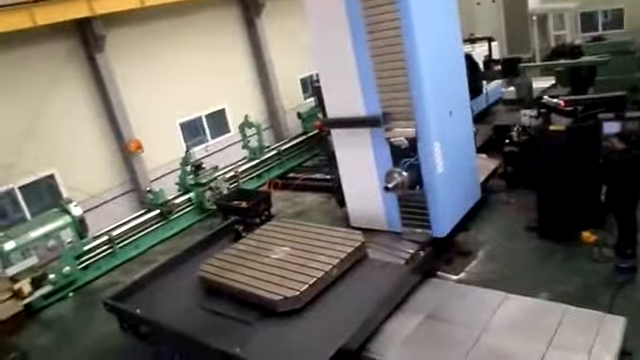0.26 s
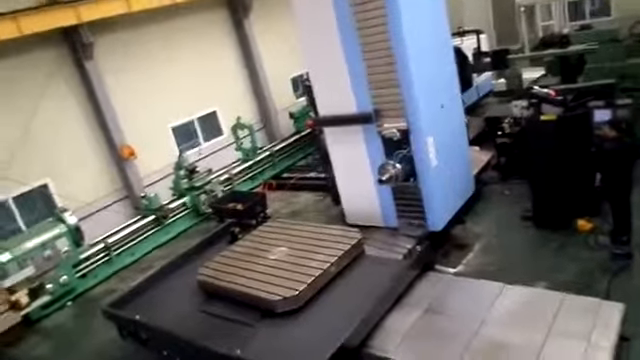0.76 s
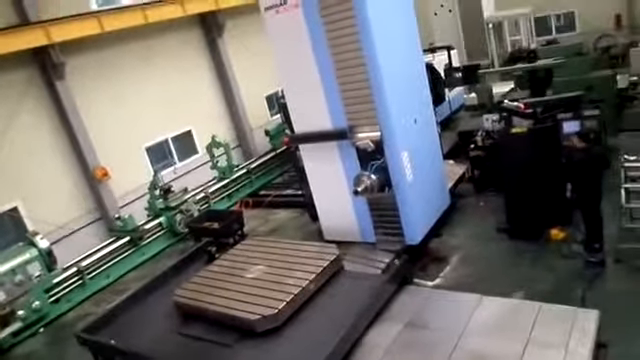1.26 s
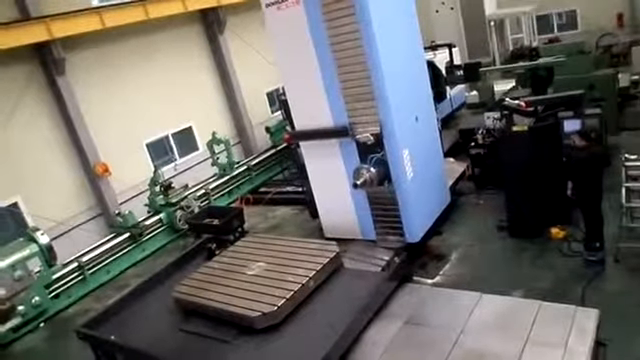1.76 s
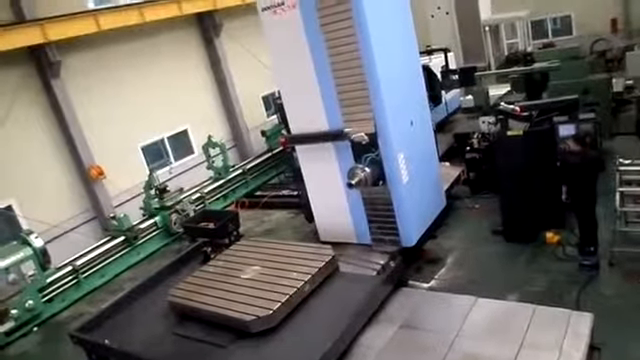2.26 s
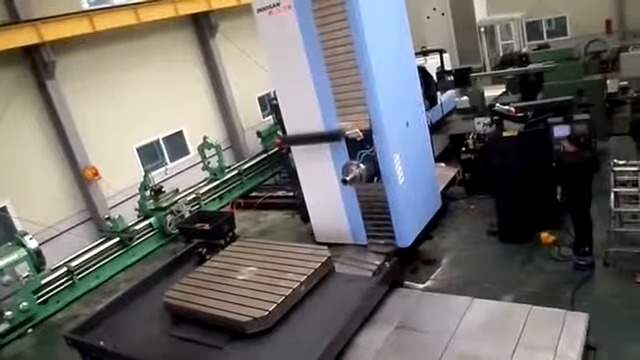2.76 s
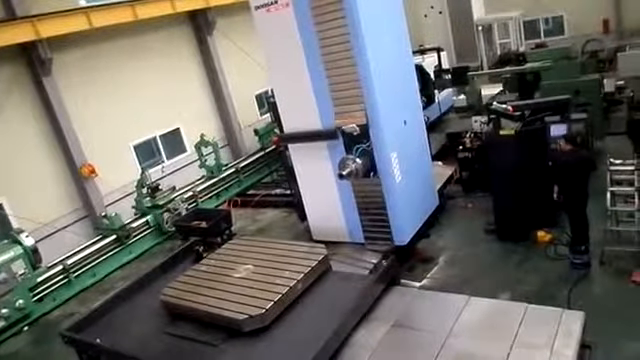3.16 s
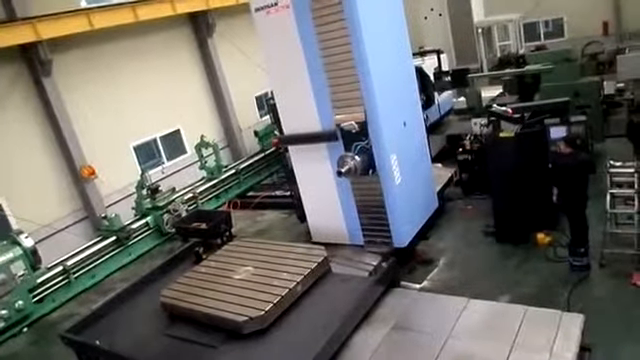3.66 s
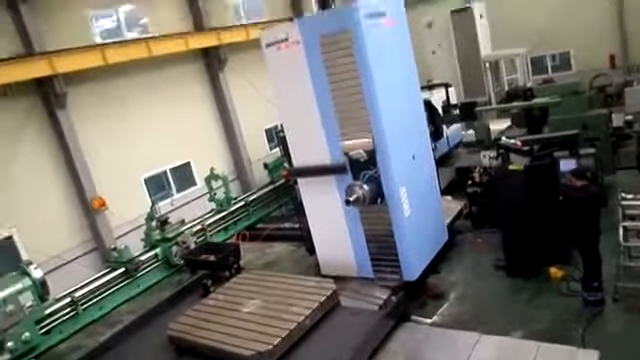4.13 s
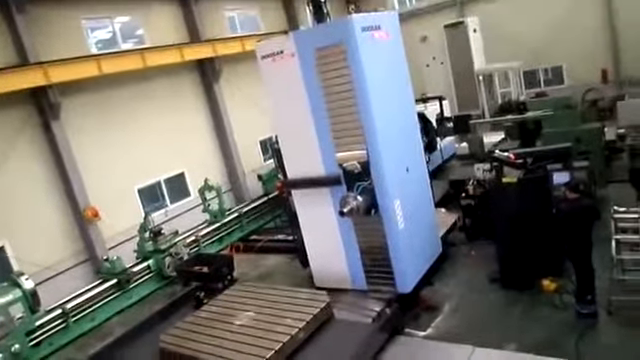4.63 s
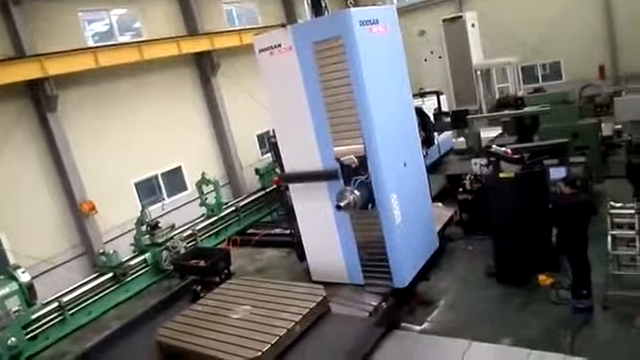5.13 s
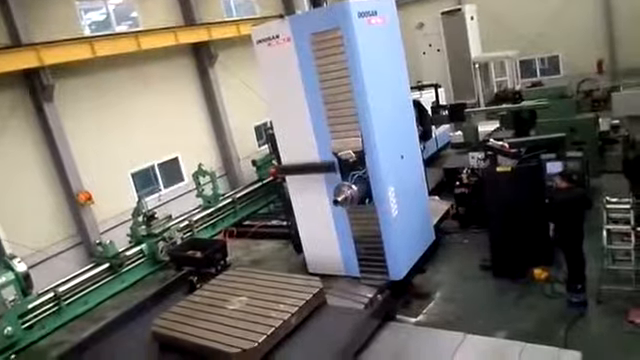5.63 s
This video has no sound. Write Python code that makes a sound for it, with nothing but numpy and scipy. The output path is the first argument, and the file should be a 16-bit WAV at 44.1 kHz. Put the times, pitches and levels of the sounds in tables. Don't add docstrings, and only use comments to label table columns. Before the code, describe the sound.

A pump hums in a noisy factory hall while a machine tool's drive whine glides up, holds, sinks to silence, then rises again.

```python
import sys
import numpy as np
from scipy import signal
from scipy.fft import rfft, irfft
from scipy.io import wavfile
from scipy.ndimage import uniform_filter1d

SR = 44100
rng = np.random.default_rng(int(sys.argv[2]) if len(sys.argv) > 2 else 0)


def pcm_store(signal):
    levels = np.round(np.clip(np.atleast_2d(signal), -1, 1) * 32767)
    wavfile.write(sys.argv[1], SR, levels.astype(np.int16).T)


def attenuation_scalar(level_db):
    decades = np.asarray(level_db, float) / 20
    return 10 ** decades


N = 259749
TURN_HZ = 11.1115
SWITCH_HZ = 4000
KNOCK_S = 2.315


def unit(x):
    return x / np.sqrt(np.mean(x ** 2) + 1e-20)


def along(points, hz):
    f, v = np.transpose(points)
    return np.interp(np.log(hz + 1), np.log(f + 1), v)


def wobble(rate):
    knots = rng.standard_normal(int(N * rate / SR) + 2)
    return np.interp(np.arange(N) * rate / SR, np.arange(len(knots)), knots)


def swings(rows):
    t = np.arange(N) / SR
    return sum(db * np.exp(-((t - s) / width) ** 2) for s, width, db in rows)


def swell(start, rise, end, fall):
    t = np.arange(N) / SR
    return -rise * np.maximum(start - t, 0) - fall * np.maximum(t - end, 0)


def rush(spectrum, patchy_db):
    hz, _, z = signal.stft(rng.standard_normal(N + 2048), SR, nperseg=2048)
    field = uniform_filter1d(rng.standard_normal(z.shape), size=20, axis=0)
    field = uniform_filter1d(field, size=4, axis=1)
    gain_db = along(spectrum, hz)[:, None] + patchy_db * unit(field)
    return unit(signal.istft(z * attenuation_scalar(gain_db), nperseg=2048)[1][:N])


def tone(turns, scatter=1):
    return np.sqrt(2) * np.exp(2j * np.pi * (turns + scatter * (rng.random() - .5)))


# frequency in Hz, t60 in seconds.
HALL_T60 = [(300, 0.6), (1200, 2.07), (4000, 1.25), (8000, 0.46), (14000, 0.27)]


def hall(hz_grid, wet_db, build):
    hz, t, z = signal.stft(rng.standard_normal(2 * SR), SR, nperseg=256)
    decay = attenuation_scalar(-60 * t / along(HALL_T60, hz)[:, None])
    tail = signal.istft(z * decay * (1 - np.exp(-t / build)), SR, nperseg=256)[1]
    return 1 + attenuation_scalar(wet_db) * rfft(tail / np.linalg.norm(tail), 2 * len(hz_grid) - 2)


def heard(partials, response, hz_grid):
    def at(hz):
        return np.interp(hz, hz_grid, response.real) + 1j * np.interp(hz, hz_grid, response.imag)

    source = np.zeros(N)
    for x, hz in partials:
        gain = at(hz)
        typical = np.sqrt(np.mean(np.abs(at(hz + np.arange(-20, 20))) ** 2))
        source += (x * np.exp(-1j * np.angle(gain))).real / max(abs(gain), .6 * typical)
    return irfft(rfft(source, 2 * len(hz_grid) - 2) * response)[:N]


FEED_CORNERS_S = [
    .19,
    .61,
    3.98,
    4.421,
    5.203,
    5.62,
]


def feed():
    speed = np.interp(np.arange(N) / SR, FEED_CORNERS_S, [0, 1, 1, 0, 0, 1])
    for _ in range(2):
        speed = uniform_filter1d(speed, int(.12 * SR))
    return speed


# time in seconds, width in seconds, change in dB.
JOLTS = [
    (.72, .05, 12),
    (4.3, 0.12, 3),
    (5.8, 0.034, -11),
]


def drive_load(speed, push):
    speeding_up_db, braking_db, cruising_db = 15.5, 15.5, 0.5
    force_db = speeding_up_db * np.maximum(push, 0) + braking_db * np.maximum(-push, 0)
    return cruising_db + force_db + swings(JOLTS) + .35 * 20 * np.log10(speed + 1e-3)


# frequency in Hz, level in dB.
PUMP = [(120, -51.5), (177, -51.5), (269.1, -37), (360, -47.5), (447.7, -50), (538.2, -48), (807.3, -58),
        (1883.7, -54.5), (2152.8, -55), (2421.9, -48), (2960, -70), (3229.2, -52.5), (3498.3, -56.5)]
# frequency in Hz, level in dB per Hz.
HALL_NOISE = [(15, -18), (30, -12), (55, -3), (95, -6.5), (125, 1), (220, -1.5), (270, 8), (330, -1.5),
              (600, -5), (1200, -5.5), (1700, -10), (3300, -11.5), (4300, -33), (10000, -21.5),
              (15000, -28.5)]


def background():
    t = np.arange(N) / SR
    hum = sum(attenuation_scalar(db + 0.57 * wobble(7)) * tone(hz * t + 0.045 * wobble(4.4)) for hz, db in PUMP)
    return hum.real + attenuation_scalar(-35 + 0.88 * wobble(1.6)) * rush(HALL_NOISE, patchy_db=1.66)


# frequency in Hz, level in dB per Hz.
GUIDES = [(100, -59), (300, -4), (700, -5), (1000, -3.5), (1250, 3), (1600, -7), (2400, -7.5), (3500, -10),
          (4200, -12), (6000, -15.5), (10000, -20.5), (12000, -32.5), (15000, -44)]


def guides(speed):
    idle_db, gain_db, lag_s, sag_db_per_s = -38, 5.5, 0.074, 0.37
    keep = np.exp(-1 / (lag_s * SR))
    lagged = signal.lfilter([1 - keep], [1, -keep], speed)
    level_db = idle_db + gain_db * lagged - sag_db_per_s * np.arange(N) / SR
    return attenuation_scalar(level_db) * rush(GUIDES, patchy_db=0.78)


def carrier(speed):
    t = np.arange(N) / SR
    first_start, halt, second_start = FEED_CORNERS_S[0], FEED_CORNERS_S[3], FEED_CORNERS_S[4]
    later = t > (halt + second_start) / 2
    since = np.maximum(t - np.where(later, second_start, first_start), 0)
    lingering = uniform_filter1d(speed, int(0.18 * SR))
    opened = np.minimum(4.4 * lingering + 0.041, 1)
    sag_db_per_s = 2
    return np.where(later, -48, -48.5) - sag_db_per_s * since * opened + 20 * np.log10(opened)


def current(speed, rising):
    sing = np.exp(-((speed - .5) / .25) ** 2)
    sing_db = np.where(rising, 9, 9) * sing
    lingering = uniform_filter1d(speed, int(.3 * SR))
    return -35.5 + 20 * np.log10(lingering + 0.038) + sing_db


# switching multiple, order of the belt pattern, level in dB.
WINDING = [(2, 24, -2.5), (2, -24, -15.5), (2, 48, -26), (3, 36, -27), (3, -36, -31), (3, 12, -34),
           (1, 12, -24)]
# time in seconds, width in seconds, change in dB.
THIRD = [
    [(.75, 0.41, 10), (5.75, .3, 4)],
    [(.75, 0.33, .5), (5.75, 0.29, 8)],
]


def inverter(speed, turns, rising, hz):
    current_db = current(speed, rising)
    clock = SWITCH_HZ * np.arange(N) / SR
    partials = []
    for m, k, db in WINDING:
        level_db = current_db + db + (2.0 + 1.0 * (m > 2)) * wobble(5.4)
        if m > 2:
            level_db = level_db + swings(THIRD[int(k > 0)])
        partials.append((attenuation_scalar(level_db) * tone(m * clock + np.round(k) * turns),
                         m * SWITCH_HZ + k * TURN_HZ))
    partials.append((attenuation_scalar(carrier(speed)) * tone(2 * clock), 2 * SWITCH_HZ))
    return heard(partials, hall(hz, wet_db=-2.0, build=0.1), hz)


# order of the belt pattern, level in dB at full feed.
TEETH = [(104, -38), (105, -44), (106, -37), (109, -44), (110, -48), (113, -47), (114, -43), (116, -48),
         (119, -49), (120, -44), (121, -46), (123, -43), (216, -49), (217, -48), (219, -43), (225, -47),
         (300, -48), (312, -52), (321, -43), (324, -47), (325, -46), (327, -45), (393, -52), (429, -51),
         (432, -57), (435, -51), (648, -54), (651, -58), (756, -61)]
# first order, last order, step in orders, level in dB.
FAINT = [(75, 102, 9, -52), (125, 130, 1, -53), (138, 153, 15, -51), (213, 215, 2, -52), (223, 227, 4, -53),
         (333, 339, 6, -57), (369, 399, 27, -59), (861, 867, 3, -67)]
# time in seconds, width in seconds, change in dB.
MESH_PATH = [
    (1.3, 0.47, -22),
    (2.3, 0.31, 4.5),
    (3.4, 0.7, -6),
]
# time in seconds, width in seconds, change in dB.
FOURTH = [
    (.85, 0.38, -9),
    (5.8, .3, -7),
]
# frequency in Hz, gain in dB.
HOUSING = [(600, -27), (790, -12.5), (860, -3), (960, -8), (1100, -1), (1200, 6), (1400, 8), (2400, -36),
           (3000, -14), (3600, 15.5), (10000, -16)]


def teeth(turns, load_db, spin_db, push, hz):
    turns = turns - turns[int(KNOCK_S * SR)]
    mesh_hz = 108 * TURN_HZ
    orders = list(TEETH)
    for first, last, step, db in FAINT:
        orders += [(k, db) for k in range(first, last + 1, step)]
    late_db = swings(FOURTH)
    levels = [(108, -30.5 + swings(MESH_PATH))]
    for k, db in orders:
        drift_db = (1.3 + 1.5 * (k > 200)) * wobble(2.5 + 4 * (k > 200))
        side_db = 3 * spin_db * (k > 109) * (1 + k / 120)
        levels.append((k, db + (k > 400) * late_db + drift_db + side_db))
    partials = []
    for k, db in levels:
        load_share = 1 if k == 108 else 0.44 * (k < 110)
        scatter = .15 if k in (104, 106, 108, 114, 120, 123) else 1
        partials.append((attenuation_scalar(db + load_db * load_share) * tone(k * turns, scatter), k * TURN_HZ))
    chatter = unit(uniform_filter1d(rng.standard_normal(N), int(.004 * SR)))
    partials.append((attenuation_scalar(1.3 * load_db - 44) * chatter * tone(108 * turns), mesh_hz))
    grind = unit(uniform_filter1d(rng.standard_normal(N), int(.008 * SR)))
    partials.append((attenuation_scalar(-36) * np.abs(push) * (1 + grind) * tone(108 * turns), mesh_hz))
    return heard(partials, attenuation_scalar(along(HOUSING, hz)) * hall(hz, wet_db=5.0, build=0.058), hz)


def pitch_errors(turns, spin_db):
    order = np.arange(1025)
    comb_db = along(GUIDES, order * TURN_HZ) + 7 * (order % 3 == 0)
    comb = attenuation_scalar(comb_db + 4 * rng.standard_normal(len(order))) * (order < 500)
    cycle = unit(irfft(comb * np.exp(2j * np.pi * rng.random(len(order))), 8192))
    return attenuation_scalar(spin_db - 45.5) * np.interp(turns % 1 * len(cycle), np.arange(len(cycle)), cycle)


# time in seconds, width in seconds, rise in dB.
SETTLE = [
    (.78, 0.13, 31.4),
    (.97, 0.064, 19),
    (4.001, .05, 29.4),
    (5.74, 0.18, 25.8),
    (5.87, 0.031, 13),
]


def settling():
    shake = rng.standard_normal((2, N))
    for _ in range(2):
        shake = uniform_filter1d(shake, int(0.035 * SR), axis=1)
    uneven = 1.2 + unit(shake[0]) * .5 + .7j * unit(shake[1])
    ring = uneven * tone(1215 * np.arange(N) / SR)
    return attenuation_scalar(-54.5 + swings(SETTLE)) * unit(ring.real)


# full from in seconds, rise in dB/s, until in seconds, fall in dB/s.
MODE_RING = [
    (.86, 300, 4.16, 53),
    (1.0, 150, 4.24, 32),
]
# time in seconds, width in seconds, change in dB.
LOW_PATH = [
    (.95, 0.096, -4.5),
    (1.11, 0.052, -23),
    (3.6, 0.34, -9),
]
# time in seconds, width in seconds, change in dB.
HIGH_PATH = [
    (1.15, 0.071, -1),
    (2.75, 0.2, 3.5),
    (3.75, 0.35, 5),
]


def column():
    turns = TURN_HZ * (np.arange(N) / SR - KNOCK_S)
    low_db = -25.5 + swell(*MODE_RING[0]) + swings(LOW_PATH)
    high_db = -36 + swell(*MODE_RING[1]) + swings(HIGH_PATH)
    return (attenuation_scalar(low_db) * tone(111 * turns, 0) + attenuation_scalar(high_db) * tone(117 * turns + 1 / 4, 0)).real


# frequency in Hz, level in dB per Hz.
JET = [(5000, -10), (9000, -10), (12300, -11), (12700, -9), (14200, -4), (14500, -28)]


def air_leak():
    level_db = -43 + swell(start=1.1, rise=150, end=1.66, fall=260) + 1.5 * wobble(7.1)
    return attenuation_scalar(level_db) * rush(JET, patchy_db=2)


# frequency in Hz, level in dB per Hz.
COVER = [(30, -25), (60, -10), (140, -5), (260, 5), (450, -3), (750, -8.5), (1500, -16), (4000, -75)]
# time in seconds, width in seconds, change in dB.
SLAMS = [
    (1.47, 0.04, 2),
    (1.57, 0.026, -2),
    (1.68, 0.11, 4),
]


def cover_rumble():
    level_db = -29.5 + swell(start=1.42, rise=46, end=1.83, fall=42)
    return attenuation_scalar(level_db + swings(SLAMS) + 0.76 * wobble(14.3)) * rush(COVER, patchy_db=-0.5)


# frequency in Hz, level in dB per Hz.
FLOOR = [(20, -12), (40, 4), (80, 0), (120, -27), (200, -60)]


def floor_boom():
    return attenuation_scalar(-46 + swell(start=1.8, rise=66, end=2.0, fall=50)) * rush(FLOOR, patchy_db=1.5)


# frequency in Hz, level in dB.
SCREW = [(865.3, -44.5), (878.2, -46.5)]


def ball_screw():
    t = np.arange(N) / SR
    return sum(attenuation_scalar(db - 6.4 * ((t - 2.7) / 0.55) ** 2) * tone(hz * t) for hz, db in SCREW).real


def scene():
    speed = feed()
    turns = np.cumsum(speed) * TURN_HZ / SR
    push = np.gradient(speed)
    push = push / push.max()
    spin_db = 20 * np.log10(speed + 1e-3)
    hz = np.fft.rfftfreq(2 ** 19, 1 / SR)
    mix = background() + guides(speed) + inverter(speed, turns, push > 0, hz)
    mix += teeth(turns, drive_load(speed, push), spin_db, push, hz) + pitch_errors(turns, spin_db)
    mix += settling() + column()
    mix += air_leak() + cover_rumble() + floor_boom() + ball_screw()
    return mix[None]


def top_cut(x):
    return signal.sosfilt(signal.butter(12, 14920, fs=SR, output="sos"), x)


def record(dry):
    return top_cut(dry)


dry = scene()
out = record(dry)
pcm_store(out)
```